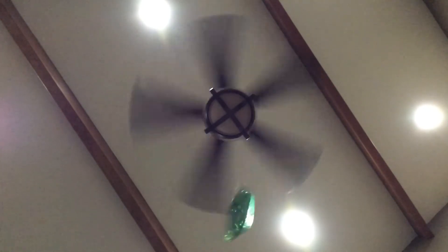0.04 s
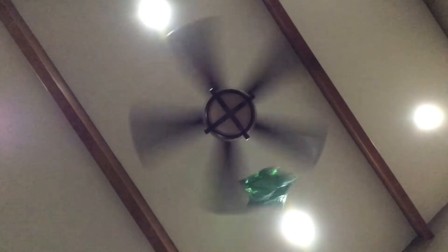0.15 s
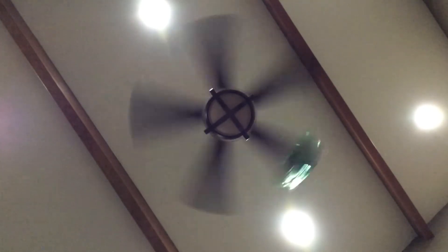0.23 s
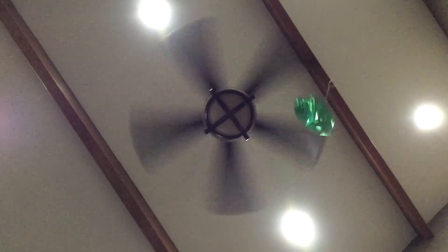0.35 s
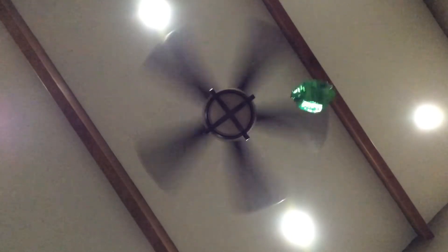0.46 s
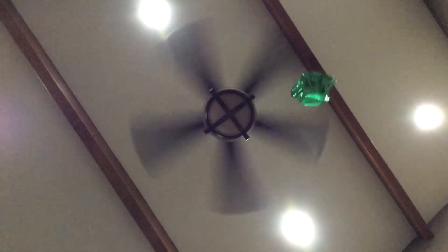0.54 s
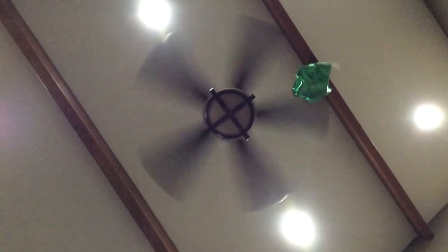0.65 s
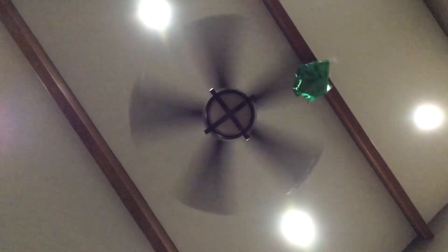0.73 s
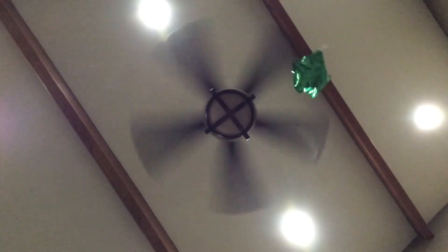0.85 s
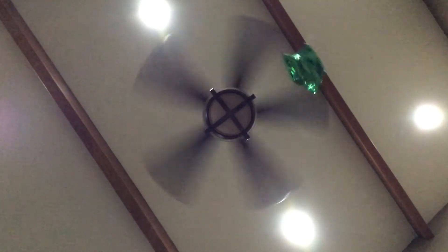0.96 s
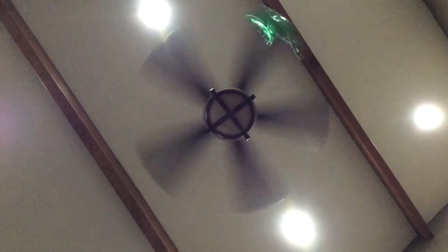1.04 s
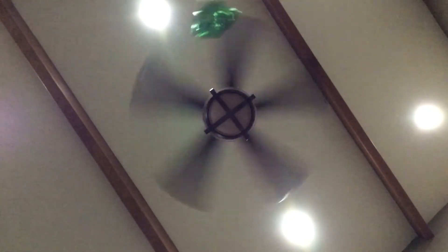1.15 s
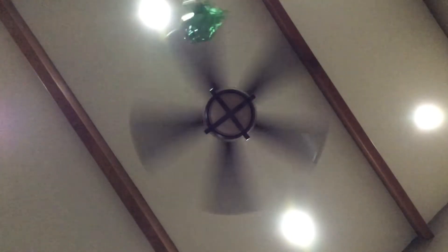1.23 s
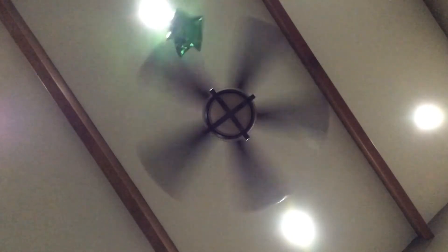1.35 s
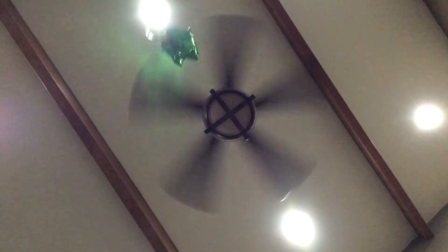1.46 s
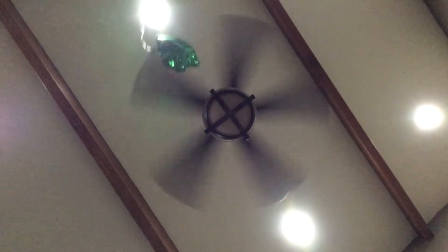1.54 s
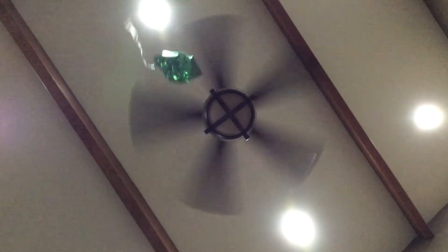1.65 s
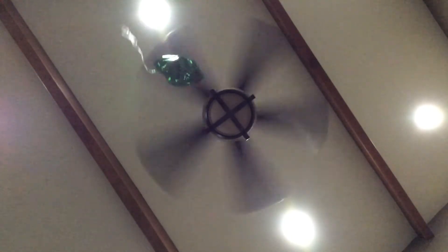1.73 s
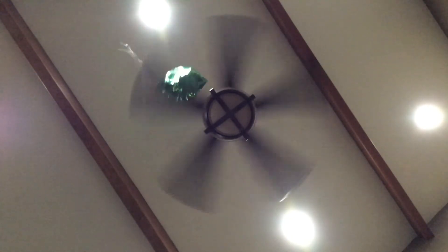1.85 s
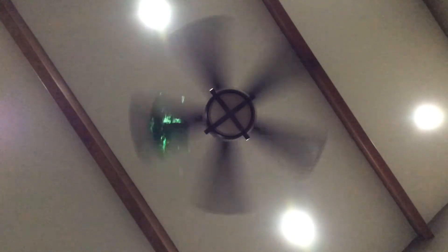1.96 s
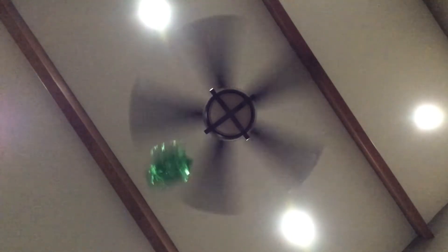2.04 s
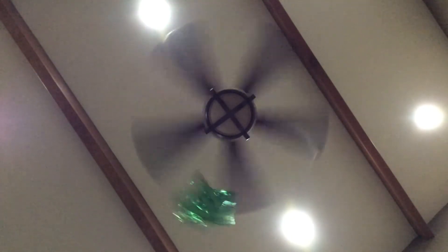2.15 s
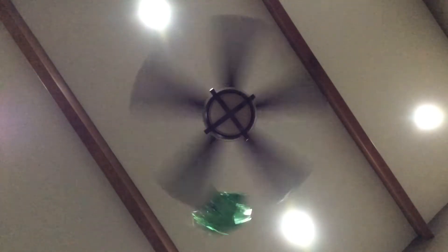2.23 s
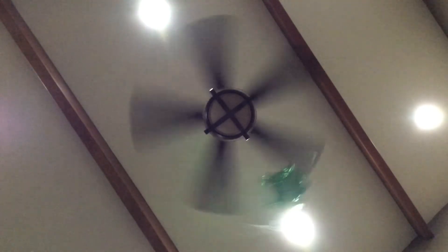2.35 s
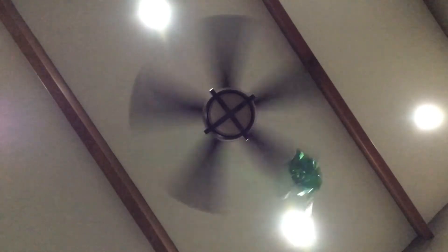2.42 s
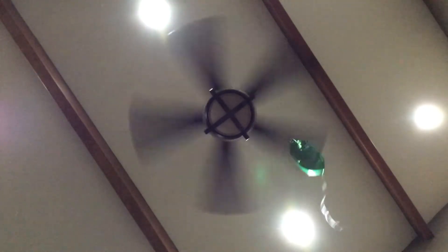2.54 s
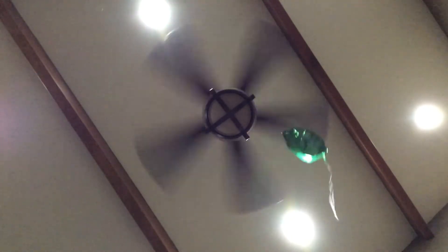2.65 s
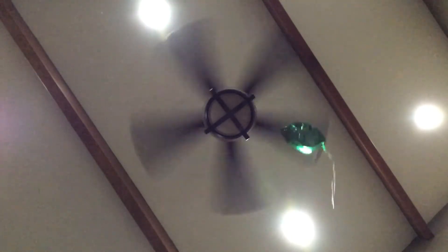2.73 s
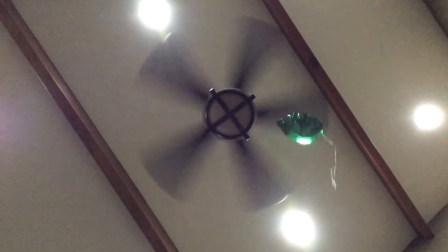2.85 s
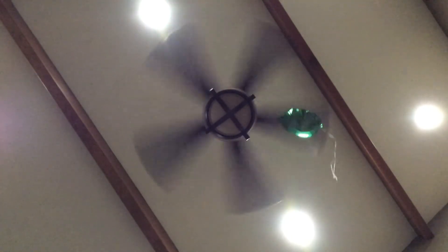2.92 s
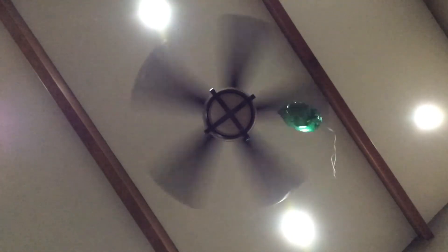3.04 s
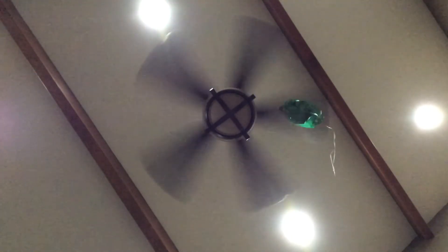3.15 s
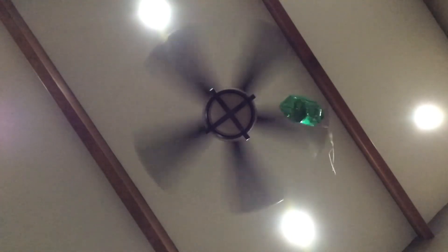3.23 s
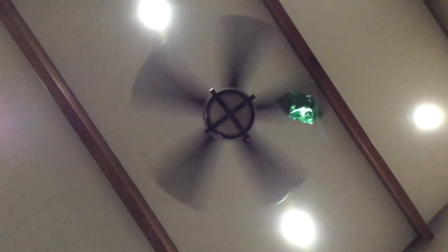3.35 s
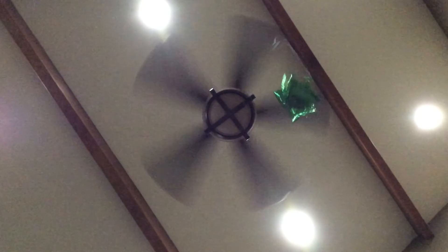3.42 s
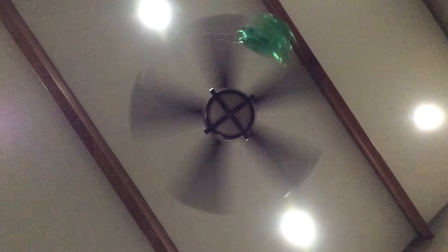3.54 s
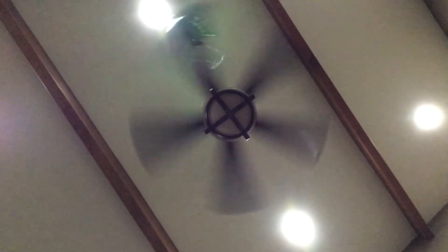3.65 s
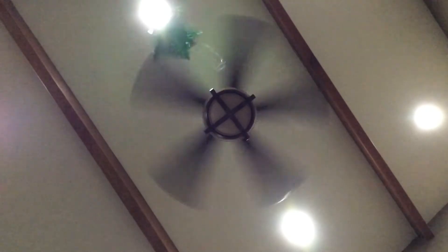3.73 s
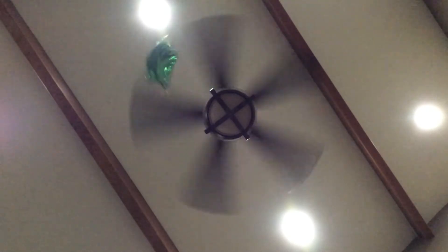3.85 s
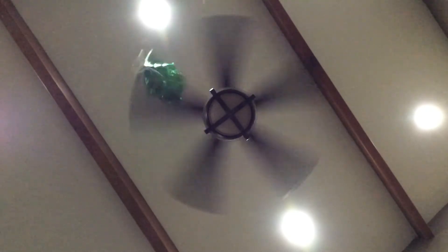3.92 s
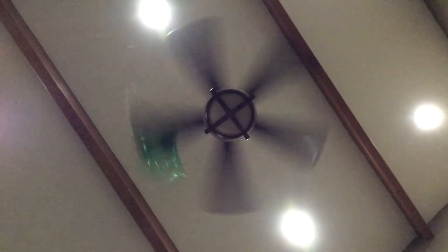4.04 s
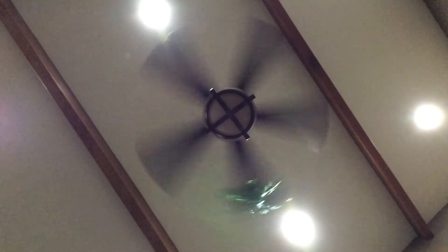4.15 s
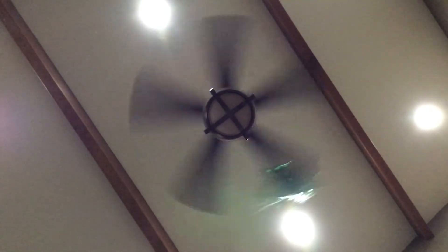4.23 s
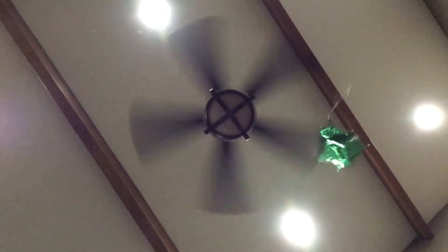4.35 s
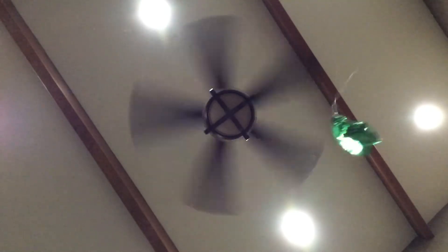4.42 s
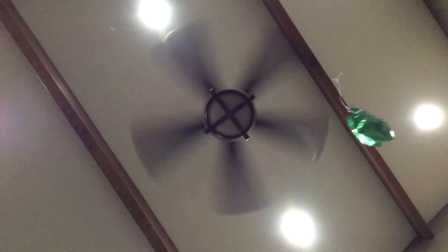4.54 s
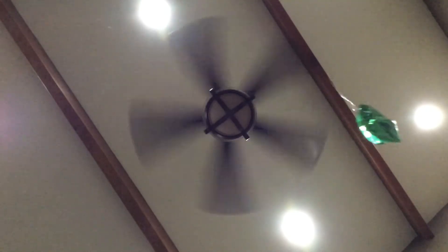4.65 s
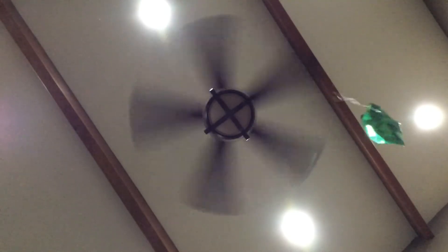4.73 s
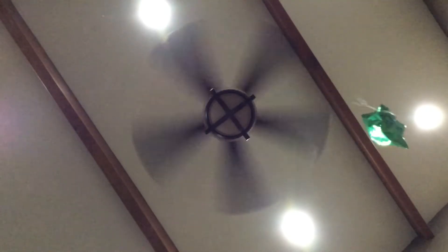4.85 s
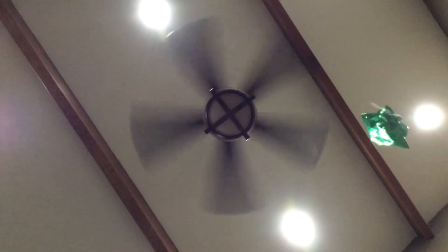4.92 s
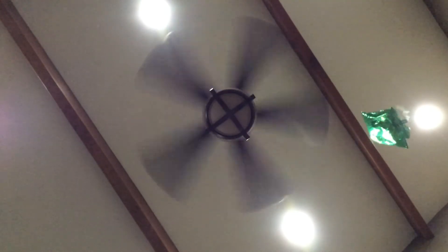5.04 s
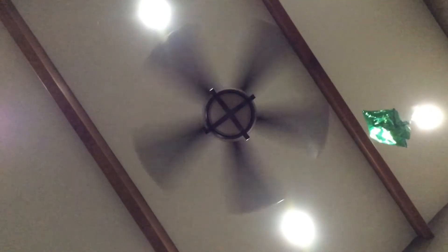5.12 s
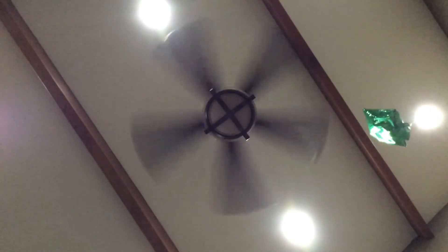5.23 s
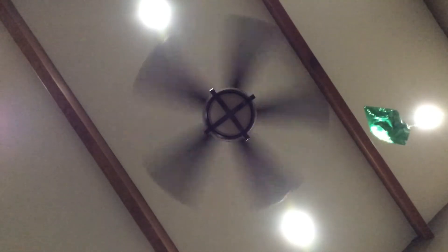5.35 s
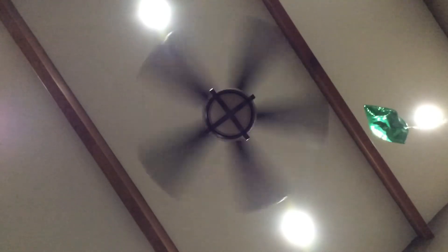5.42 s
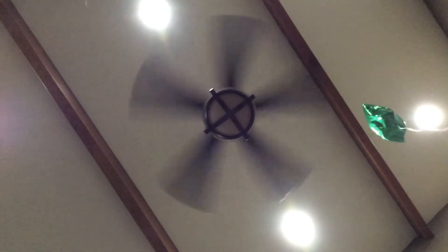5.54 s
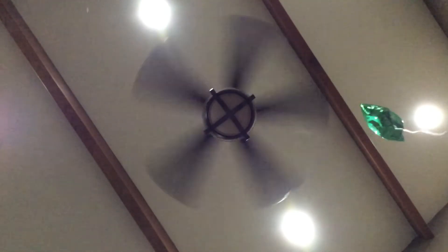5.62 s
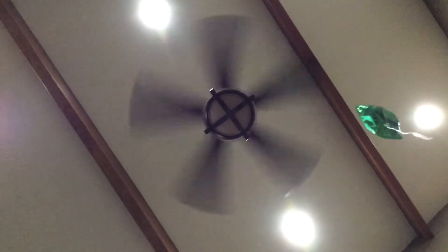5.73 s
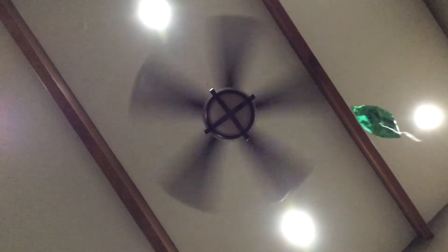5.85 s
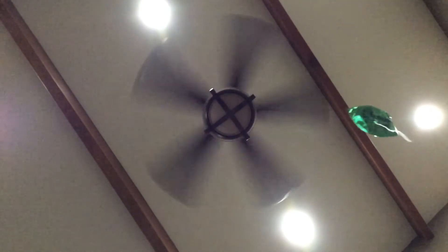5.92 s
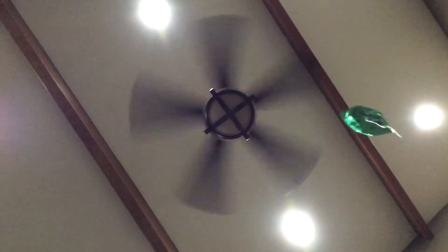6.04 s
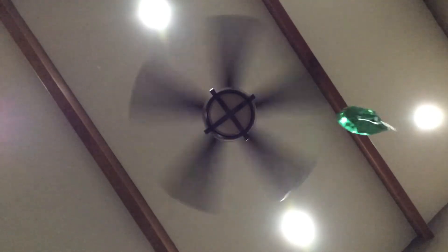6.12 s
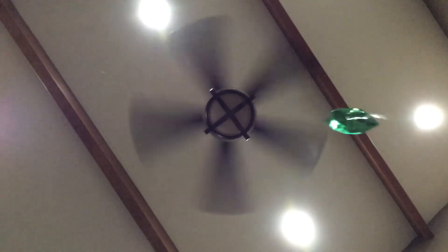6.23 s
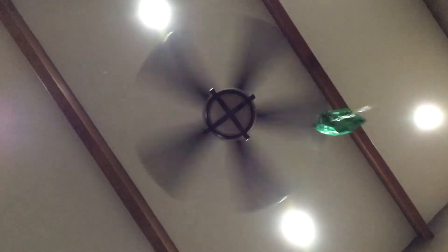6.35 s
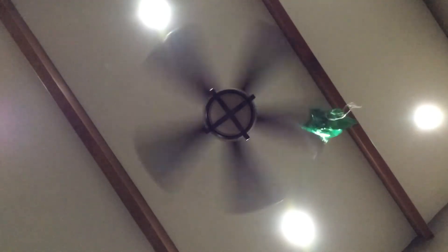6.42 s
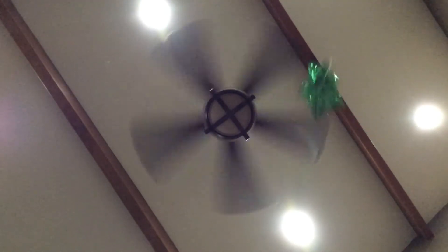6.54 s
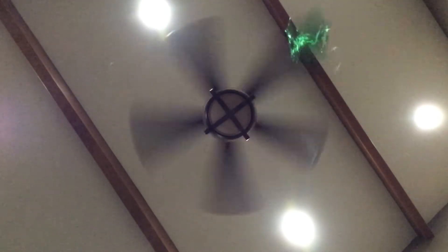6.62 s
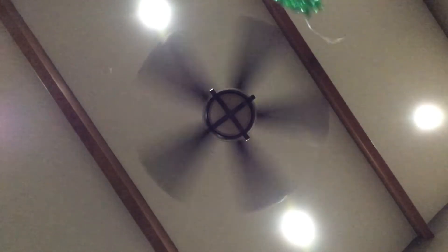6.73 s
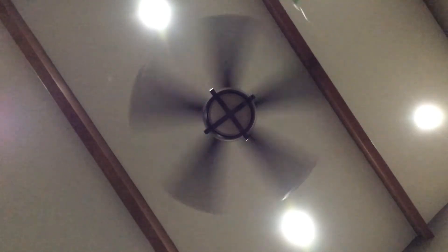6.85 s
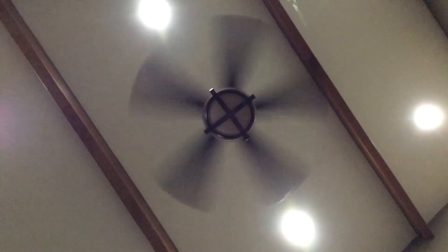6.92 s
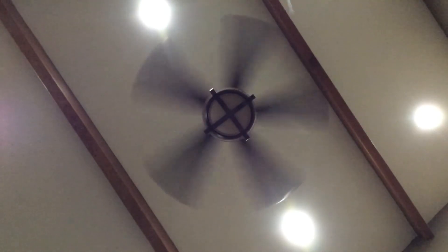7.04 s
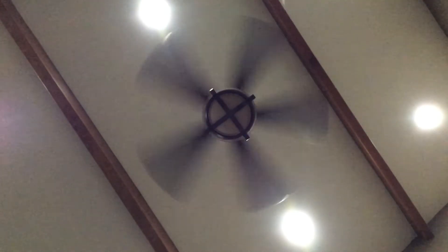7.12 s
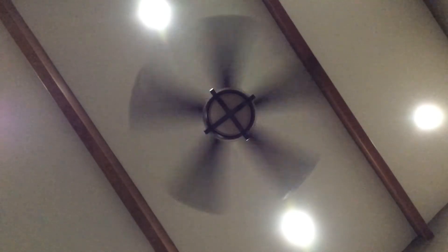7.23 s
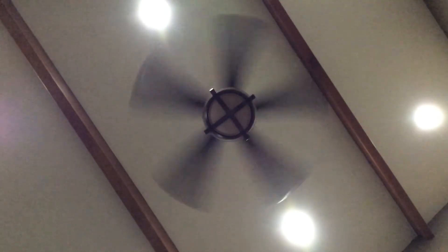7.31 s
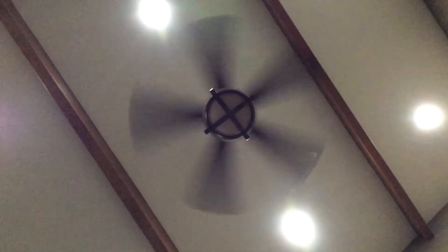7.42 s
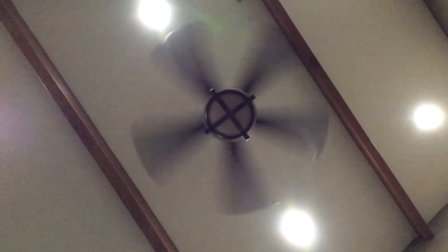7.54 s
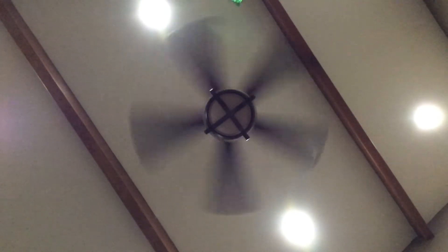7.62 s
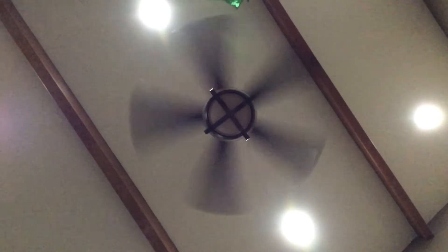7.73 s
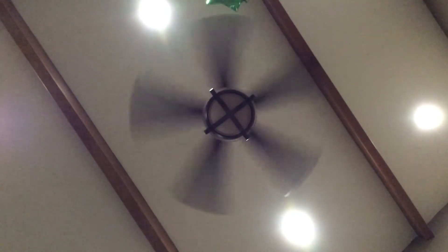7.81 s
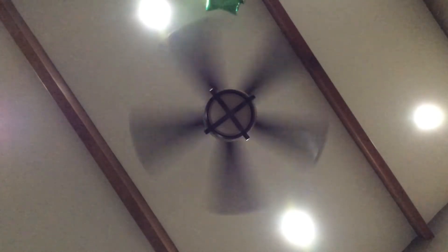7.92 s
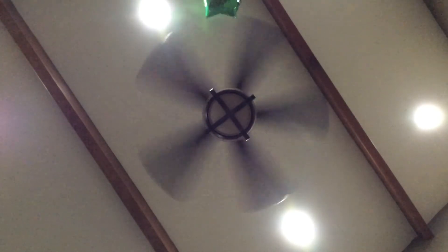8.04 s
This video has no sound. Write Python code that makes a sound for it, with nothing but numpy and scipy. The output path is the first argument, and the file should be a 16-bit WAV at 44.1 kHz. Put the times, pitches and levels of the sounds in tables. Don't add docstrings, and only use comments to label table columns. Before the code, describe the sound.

A crinkly foil balloon is slapped by spinning fan blades in sharp, hollow rattling bursts, with quiet gaps of low rumbling air and faint hiss.

```python
import sys
import numpy as np
from scipy import signal
from scipy.io import wavfile
from scipy.ndimage import uniform_filter1d

SR = 44100
rng = np.random.default_rng(int(sys.argv[2]) if len(sys.argv) > 2 else 0)


def master(y):
    cut = np.clip(np.atleast_2d(y).T, -1, 1)
    pcm = np.round(cut * 32767)
    wavfile.write(sys.argv[1], SR, pcm.astype(np.int16))


def nominal_scale(level):
    x = np.asarray(level, float) / 20
    return 10 ** x


N = 356063

# t/s, snap level/dB, skin level above the snap/dB, crumpling time/ms
SLAPS = [(0.0568, -23, -15.5, 28), (0.1521, -14.5, 1, 14.5), (0.1578, -10.5, -19.5, 15),
         (0.279, -11.5, -16, 23), (0.984, -28.5, -8, 25), (1.0617, -22, -12, 4.1), (1.077, -3, 2, 4.5),
         (1.1047, -19, 2.5, 9.2), (1.891, -17.5, -24.5, 13), (1.9973, -10, -6.5, 14.4),
         (2.1833, -12.5, -16, 12.5), (2.334, -13, -6, 35), (2.3486, -6.5, -23, 10),
         (2.3864, -20, -10.5, 9.6), (3.3962, -12.5, -18, 6), (3.493, -21, 4, 12), (3.6658, -14.5, -9, 7.7),
         (3.687, -4, 7, 7.5), (3.9517, -14.5, -27.5, 14), (4.0733, -3, -6.5, 11.3), (4.4294, -20, -19, 12),
         (6.334, -28, -27, 10), (6.347, -27, -18, 10), (6.418, -14.5, -19, 18.7), (6.5091, -5, -3, 3),
         (6.5184, -5.5, -7.5, 10), (6.642, -2, -5.5, 5.7), (6.6667, -11, -0.5, 7.8)]
SHOVES = [(0.0034, -24, -1, 34), (0.1694, -12.5, -12.5, 11), (0.2683, -18.5, -4.5, 14),
          (0.3047, -13, -11.5, 9.9), (1.002, -22, -12, 18), (1.0722, -8, -6, 11), (1.0833, -2.5, -8.5, 5.8),
          (1.9083, -16, -30.5, 9.3), (1.99, -20, -3, 9.8), (2.0344, -20.5, -22, 58), (2.203, -12, -15, 21),
          (2.2244, -16.5, -17, 17), (2.3616, -12.5, -5.5, 15.6), (3.4124, -18, -8.5, 27),
          (3.5134, -10.5, -8, 24), (3.5394, -16.5, -10, 5.7), (3.5944, -24.5, -18, 15),
          (3.683, -6.5, -5.5, 6.1), (3.6989, -18.5, -8, 7.6), (3.883, -28.5, -9, 13),
          (3.9734, -17.5, -15.5, 27), (4.0549, -19.5, -19, 13), (4.0655, -11.5, -10.5, 3.9),
          (4.0844, -17, -8.5, 6.5), (4.1447, -15, -3.5, 9), (4.446, -23, -22, 5.1), (6.4344, -21, -21, 6.7),
          (6.5594, -20.5, -18, 16), (6.6308, -10, -6, 9.4), (6.6884, -13, -5.5, 2.3)]
# t/s, level/dB, fading time/ms
FLAT_HITS = [
    (1.079, -9, 11),
    (2.35, -24.5, 11.6),
    (3.685, -12.5, 9.1),
    (4.068, -16.5, 8),
    (6.645, -18, 10.1),
]
# t/s, level/dB
TICKS = [(0.823, -54.5), (0.908, -51.5), (1.425, -48.5), (1.4664, -50), (1.557, -54), (5.2806, -55),
         (5.389, -56.5), (5.772, -48.5), (5.7994, -70), (6.079, -57), (6.0994, -66), (7.0102, -51.5),
         (7.0394, -68)]
# t/s, level/dB
DRAG = [
    (4.18, -44),
    (4.21, -39),
    (4.352, -37.5),
    (4.419, -58.5),
]
# f/Hz, level per Hz/dB
FOIL_TONE = [(710, -24.5), (1200, -2), (1610, -6), (2350, -7.5), (3220, -4), (4500, -8), (6870, 1.5),
             (7740, -3), (8350, -1.5), (14200, -16), (16000, -21)]
# f/Hz, width/Hz, level/dB
SKIN_MODES = [(362, 390, -8.5), (610, 380, -2.5), (760, 390, 3), (1058, 230, 2), (1433, 220, -2),
              (1820, 780, -4)]
# f/Hz, width/Hz, level/dB
DRUM_MODES = [(143, 48, -9), (206, 40, -9), (205, 140, 4), (290, 30, -8)]
# delay t/s, level/dB
ECHOES = [(.0023, -15), (.0051, -10.5), (.0087, -14), (0.0175, -12)]
# f/Hz, time/s
ROOM_DECAY = [(100, 0.21), (260, 0.35), (700, 0.44), (1840, 0.49), (4850, 0.44), (12800, 0.3)]
# t/s, rumble level/dB
DRAUGHT = [(0.0, -49.5), (1.01, -58), (1.24, -53.5), (2.43, -50), (3.08, -55), (3.48, -52), (7.46, -55.5),
           (8.07, -56.5)]
# start t/s, length/s, level/dB
GUSTS = [(0.079, 0.119, -48), (0.257, 0.089, -43), (0.552, 0.035, -48), (1.053, 0.177, -44.5),
         (1.366, 0.099, -43.5), (1.546, 0.031, -47.5), (1.648, 0.46, -44.5), (2.159, 0.434, -39.5),
         (2.632, 0.075, -43), (2.783, 0.039, -47), (2.945, 0.063, -42.5), (3.055, 0.031, -48),
         (3.194, 0.141, -41), (3.402, 0.36, -43.5), (3.831, 0.035, -47.5), (4.033, 0.33, -37.5),
         (4.521, 0.033, -47.5), (4.61, 0.033, -48), (4.701, 0.147, -46), (4.95, 0.055, -47),
         (5.112, 0.111, -44.5), (5.264, 0.121, -45.5), (5.599, 0.031, -48), (5.705, 0.037, -46.5),
         (5.832, 0.069, -49), (6.394, 0.059, -45.5), (6.577, 0.123, -43), (7.203, 0.033, -48)]
# f/Hz, level per Hz/dB
RUMBLE_TONE = [(12, -62), (20, -29.5), (27, -23), (41, -22.5), (59, 6.5), (78, 5.5), (97, -22), (110, -11),
               (140, -45.5), (240, -120)]
# f/Hz, level per Hz/dB
WASH_TONE = [(59, -29), (100, -8.5), (242, -8), (324, -18.5), (399, -18), (580, -23), (1200, -37),
             (1560, -59.5), (2640, -120)]
# f/Hz, level per Hz/dB
HISS_TONE = [(350, -32), (600, -6), (792, -6.5), (872, -8.5), (1840, -8.5), (2060, -14), (8720, -16.5),
             (14200, -26), (16500, -49.5)]


def balloon():
    contacts = SLAPS + SHOVES
    _, snap_db, weight_db, _ = np.transpose(contacts)
    is_slap = np.arange(len(contacts)) < len(SLAPS)
    rise_ms = np.where(is_slap, 0.8, 6.5)
    crumple = pressure(contacts, snap_db - 11.5, rise_ms) + loose_foil()
    struck = pressure(contacts, snap_db + weight_db - 12, rise_ms, brief=0.65) + nominal_scale(-6.5) * crumple
    thump_db = np.where(is_slap, -16, -13.5) + 0.67 * weight_db
    drummed = pressure(contacts, snap_db + thump_db - 4, rise_ms, brief=0.94) + flat_hits()
    return foil(crumple) + skin(struck) + drum(drummed)


def foil(crumple):
    return signal.oaconvolve(crumple * snaps(12000, spread_db=2), colour(FOIL_TONE))[:N]


def skin(struck):
    return signal.oaconvolve(struck * snaps(4000, spread_db=3.6), modes(SKIN_MODES))[:N]


def drum(drummed):
    return signal.oaconvolve(drummed * snaps(900, spread_db=1.3), modes(DRUM_MODES))[:N]


def loose_foil():
    t = np.arange(N) / SR
    drag_s, drag_db = np.transpose(DRAG)
    strength = nominal_scale(np.interp(t, drag_s, drag_db, -120, -120))
    for s, db in TICKS:
        strength += nominal_scale(db - 11.5) * np.exp(-abs(t - s) / 0.0084)
    return strength


def flat_hits():
    level_db = np.transpose(FLAT_HITS)[1] - 3
    return pressure(FLAT_HITS, level_db, rise_ms=np.full(len(FLAT_HITS), 11))


def pressure(contacts, level_db, rise_ms, brief=1):
    lead = SR // 10
    power = np.zeros(N + SR)
    ms = (np.arange(3 * lead) - lead) * 1000 / SR
    for (s, *_, lasts_ms), db, rise in zip(contacts, level_db, rise_ms):
        build_up = ms / max(rise, 0.2)
        let_go = -ms / max(brief * lasts_ms, 1)
        shape = np.where(ms < 0, build_up, let_go)
        power[round(s * SR):][:len(ms)] += nominal_scale(2 * db) * np.exp(2 * shape)
    return np.sqrt(power[lead:lead + N])


def snaps(per_s, spread_db, clump_db=1.5):
    clumps = evened(uniform_filter1d(rng.standard_normal(N), size=160))
    large = np.minimum(rng.exponential(1, N), 4)
    size = nominal_scale(spread_db * large + clump_db * clumps) * rng.choice([-1., 1.], N)
    return evened(size * (rng.random(N) < per_s / SR))


def modes(table):
    t = np.arange(SR // 8) / SR
    ring = np.zeros(len(t))
    for hz, width, db in table:
        fade = np.sqrt(width) * np.exp(-np.pi * width * t)
        ring += nominal_scale(db) * fade * np.sin(2 * np.pi * hz * t)
    return ring / np.linalg.norm(ring)


def colour(tone, size=4096):
    level_db = read(tone, abs(np.fft.fftfreq(size, 1 / SR)))
    log_gain = np.log(nominal_scale(np.maximum(level_db, -100)))
    spectrum = np.exp(np.conj(signal.hilbert(log_gain)))
    taps = np.fft.ifft(spectrum).real[:size // 2]
    return taps / np.linalg.norm(taps)


def room(x, turns_per_s=45):
    early = np.zeros(SR // 10)
    early[0] = 1
    for s, db in ECHOES:
        early[round(s * SR)] = nominal_scale(db)
    out = signal.oaconvolve(x, early)[:N]
    turn = np.pi * turns_per_s * np.arange(N) / SR
    for k in range(3):
        share = np.sqrt(2 / 3) * np.cos(turn + k * np.pi / 3)
        out += nominal_scale(-0.5) * signal.fftconvolve(x * share, room_tail())[:N]
    return out


def room_tail():
    taps = np.zeros(SR)
    at = np.arange(400, SR - 12, 12)
    at = at + rng.integers(0, 12, len(at))
    taps[at] = rng.choice([-1., 1.], len(at))
    hz, t, z = signal.stft(taps, SR, nperseg=256)
    fade = nominal_scale(-60 * t / read(ROOM_DECAY, hz)[:, None])
    tail = signal.istft(z * fade, SR, nperseg=256)[1]
    return tail / np.linalg.norm(tail)


def fan_air():
    power = draught_power()
    hiss = nominal_scale(-73) * noise(HISS_TONE, patchy_db=1, size=1024)
    return rumble(power) + wash(power) + hiss


def draught_power():
    t = np.arange(N) / SR
    edge_s = 0.01
    power = nominal_scale(2 * (np.interp(t, *np.transpose(DRAUGHT)) + 1.5))
    for s, length, db in GUSTS:
        from_middle = abs(t - s - length / 2)
        outside = np.maximum(from_middle - length / 2 + edge_s / 2, 0) / edge_s
        power = power + nominal_scale(2 * (db - 4)) * np.exp(-outside ** 2)
    return power


def rumble(power):
    lumps = noise(RUMBLE_TONE, patchy_db=1, size=4096)
    flutter = abs(signal.hilbert(lumps)) + 0.2
    return np.sqrt(power) * evened(lumps / flutter ** 0.25)


def wash(power):
    t = np.arange(N) / SR
    stir = np.zeros(N)
    for s, snap_db, *_ in SLAPS:
        stir += nominal_scale(2 * (snap_db - 30)) * np.exp(-2 * abs(t - s) / 0.093) * (t > s)
    flow = nominal_scale(2 * -60) * (power / np.median(power)) ** 0.55
    return np.sqrt(flow + stir) * noise(WASH_TONE, patchy_db=2.5, size=2048)


def noise(tone, patchy_db, size):
    hop = size // 4
    hz = np.fft.rfftfreq(size, 1 / SR)
    a, b, patches = rng.standard_normal((N // hop + 5, len(hz), 3)).T
    patches = uniform_filter1d(patches, size=10, axis=0)
    patches = evened(uniform_filter1d(patches, size=8, axis=1))
    z = (a + 1j * b) * nominal_scale(read(tone, hz)[:, None] + patchy_db * patches)
    return evened(signal.istft(z, nperseg=size, noverlap=size - hop)[1][:N])


def evened(x):
    return x / np.sqrt(np.mean(x ** 2) + 1e-20)


def read(points, hz):
    f, value = np.transpose(points)
    return np.interp(np.log(hz + 1), np.log(f + 1), value)


def scene():
    bass_cut = signal.butter(4, 120, "high", fs=SR, output="sos")
    return (signal.sosfilt(bass_cut, room(balloon())) + fan_air())[None]


def band_limit(x):
    return signal.sosfilt(signal.butter(12, 16990, fs=SR, output="sos"), x)


def record(dry):
    ceiling, top_hz = 1.2, 15900
    held = ceiling * np.tanh(dry / ceiling)
    mix = signal.oaconvolve(held, signal.firwin(511, top_hz, fs=SR)[None], "same")
    return band_limit(mix)


dry = scene()
out = record(dry)
master(out)
```